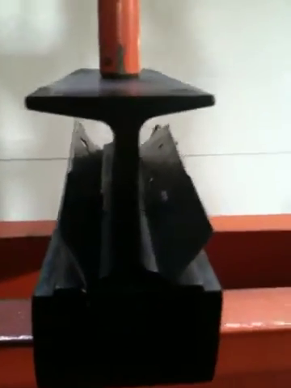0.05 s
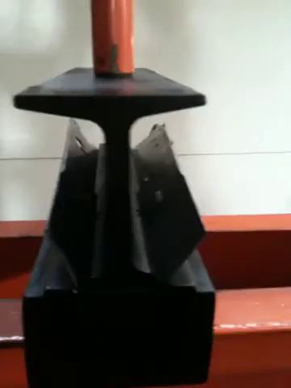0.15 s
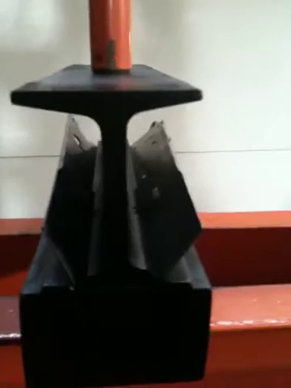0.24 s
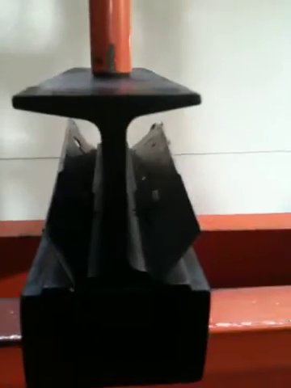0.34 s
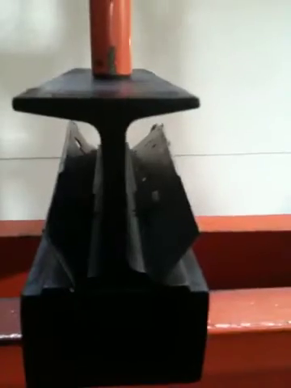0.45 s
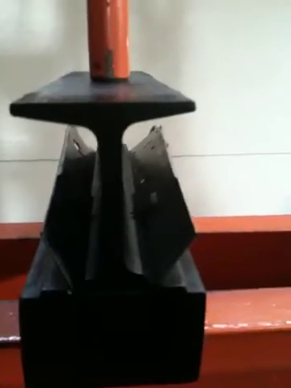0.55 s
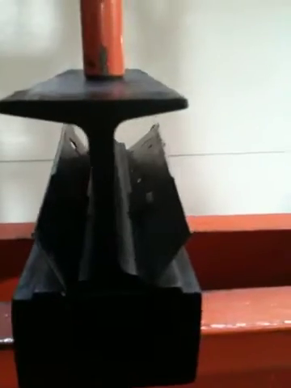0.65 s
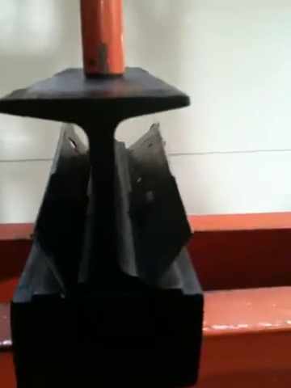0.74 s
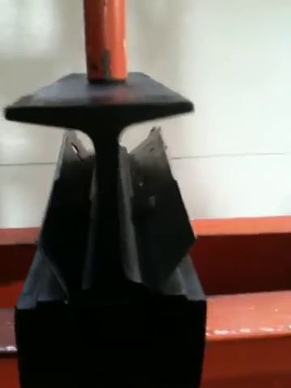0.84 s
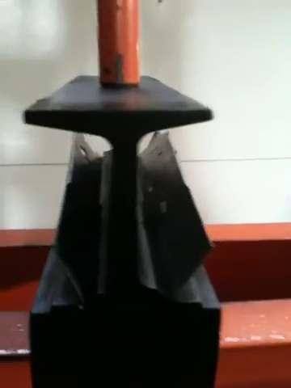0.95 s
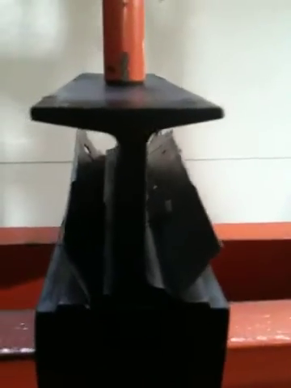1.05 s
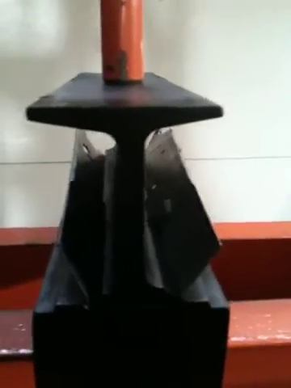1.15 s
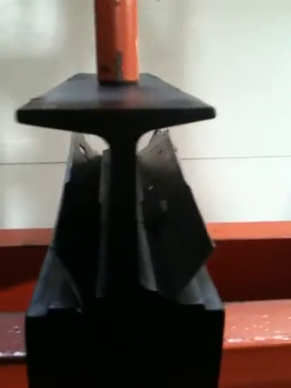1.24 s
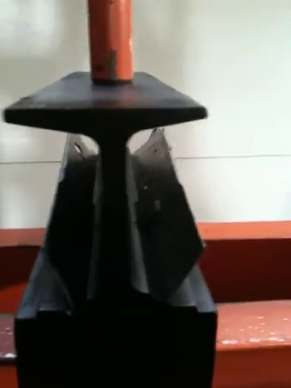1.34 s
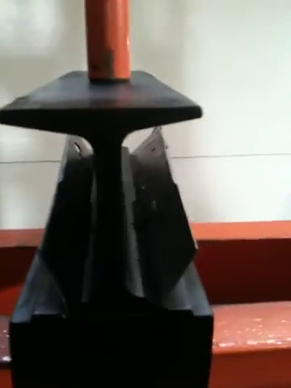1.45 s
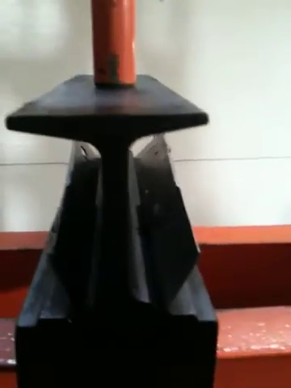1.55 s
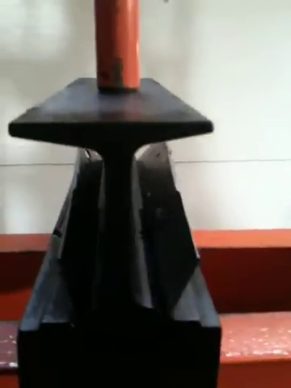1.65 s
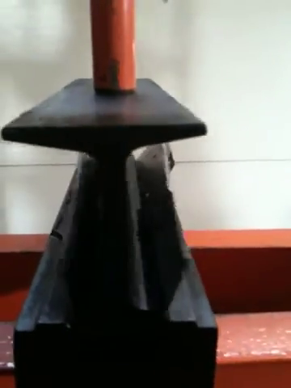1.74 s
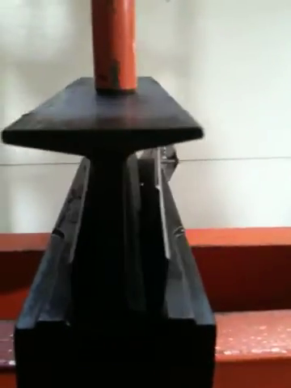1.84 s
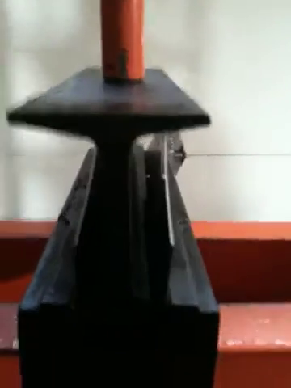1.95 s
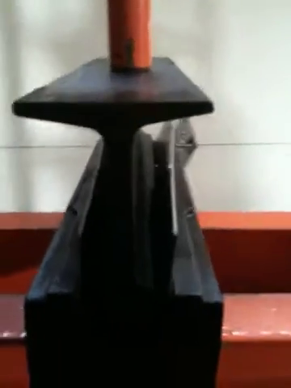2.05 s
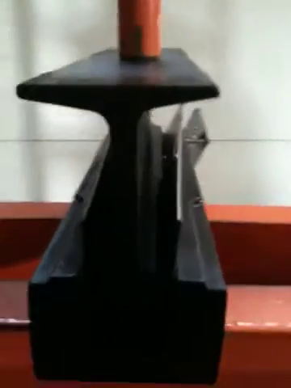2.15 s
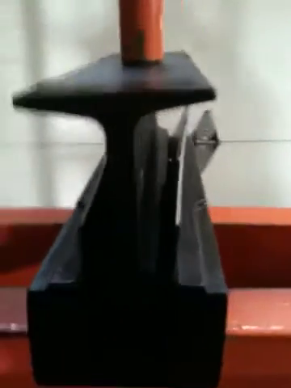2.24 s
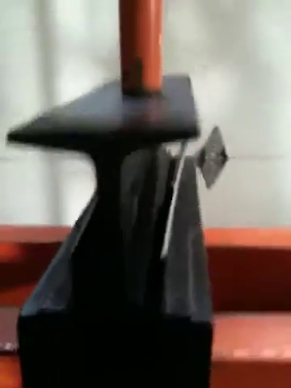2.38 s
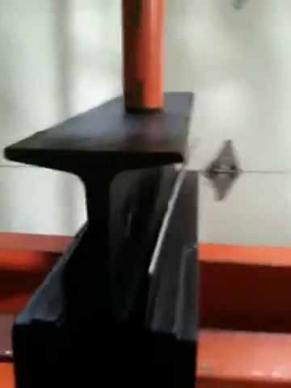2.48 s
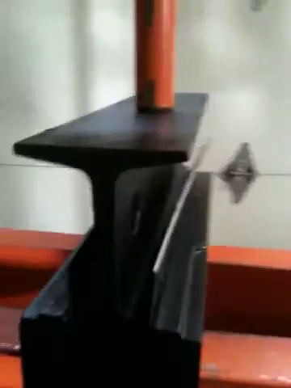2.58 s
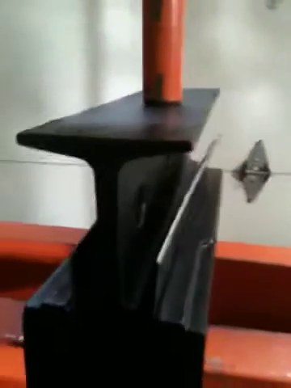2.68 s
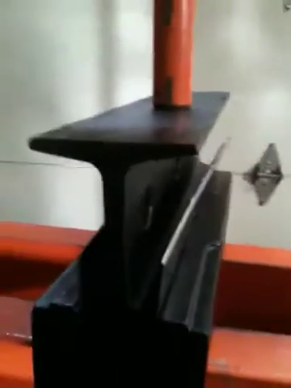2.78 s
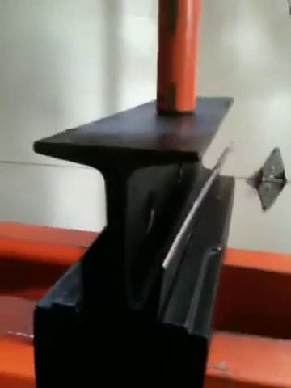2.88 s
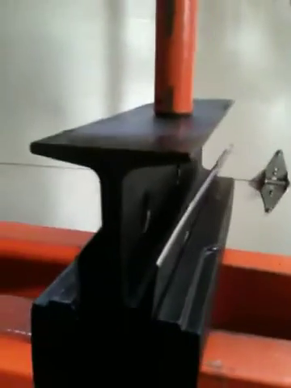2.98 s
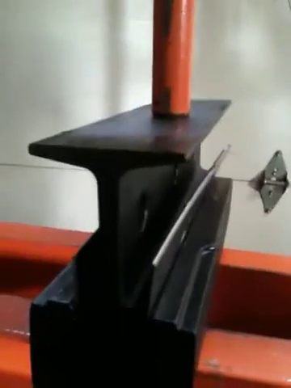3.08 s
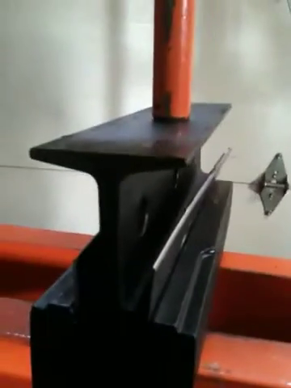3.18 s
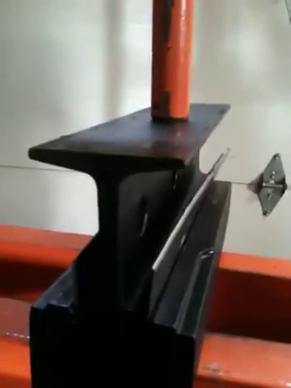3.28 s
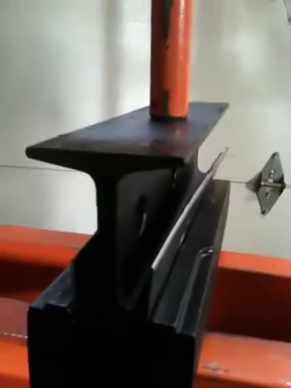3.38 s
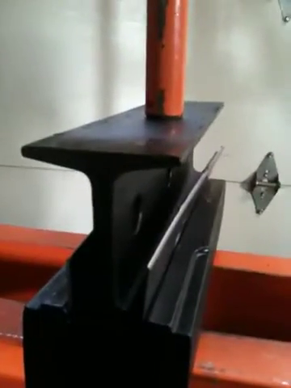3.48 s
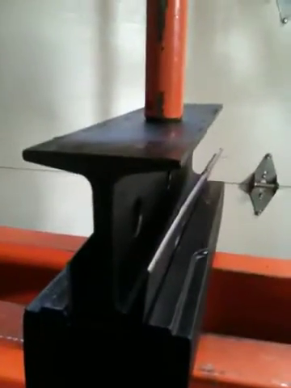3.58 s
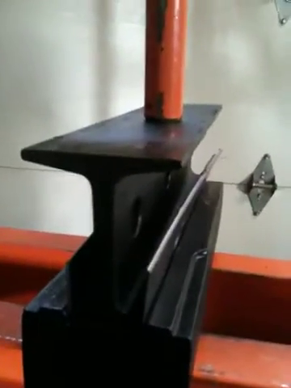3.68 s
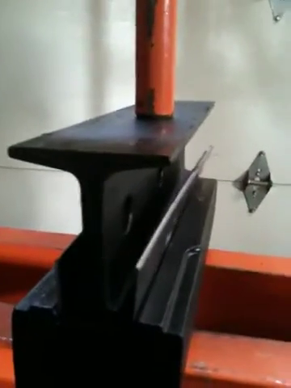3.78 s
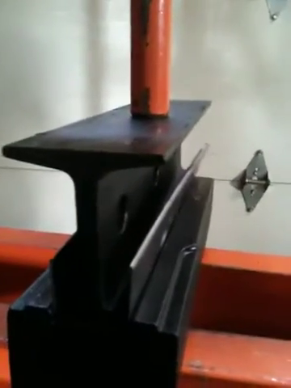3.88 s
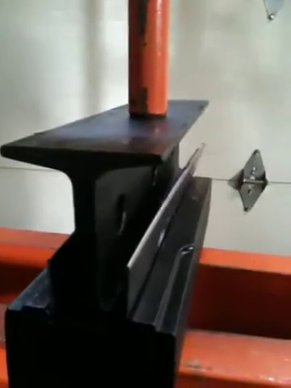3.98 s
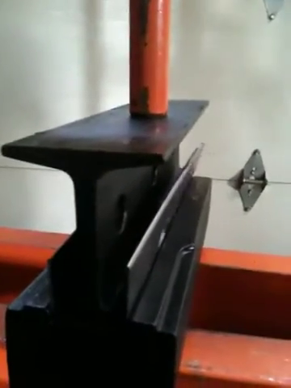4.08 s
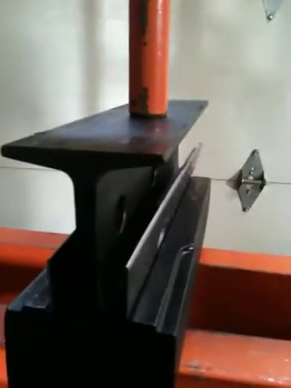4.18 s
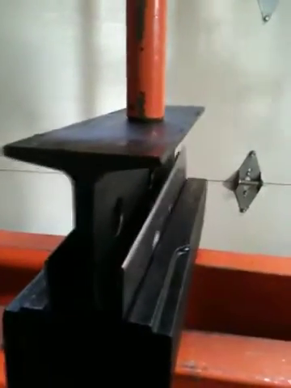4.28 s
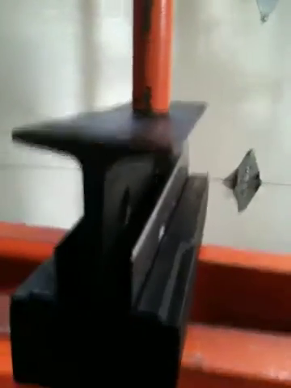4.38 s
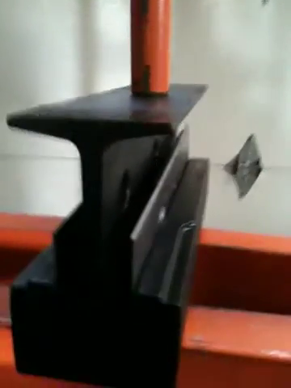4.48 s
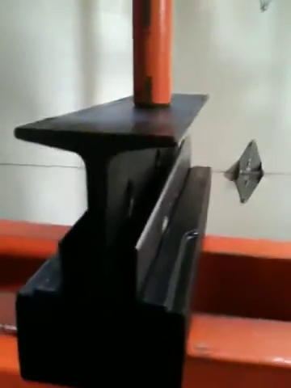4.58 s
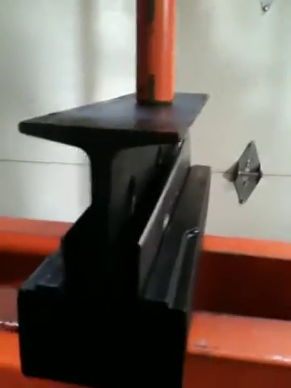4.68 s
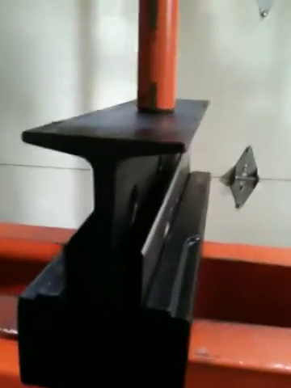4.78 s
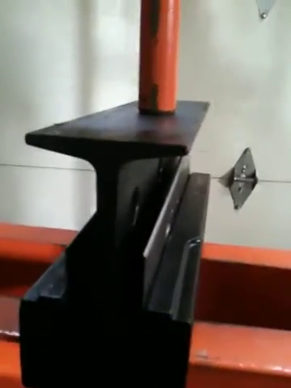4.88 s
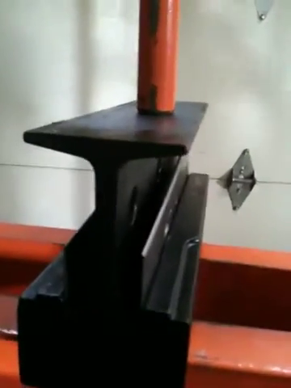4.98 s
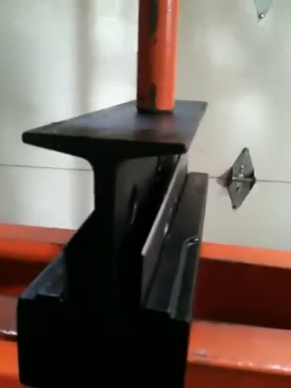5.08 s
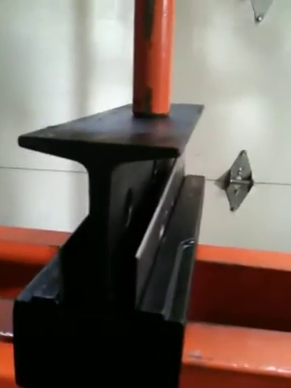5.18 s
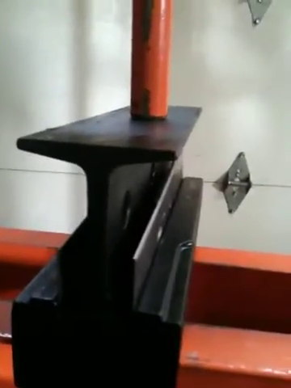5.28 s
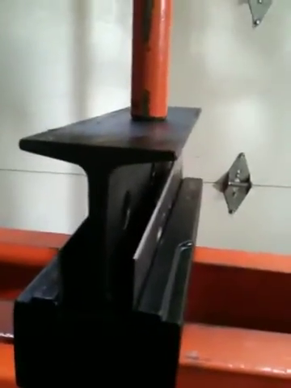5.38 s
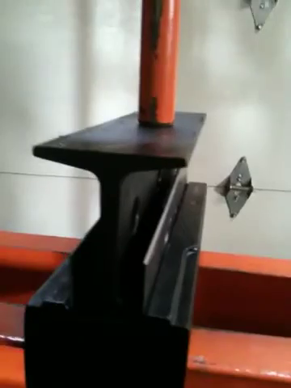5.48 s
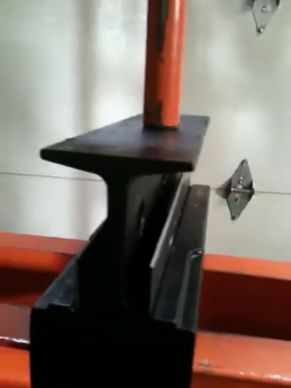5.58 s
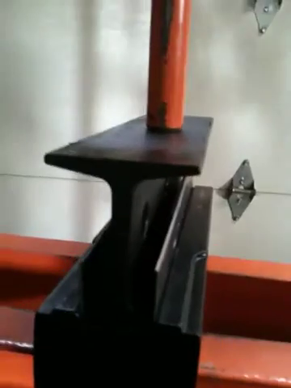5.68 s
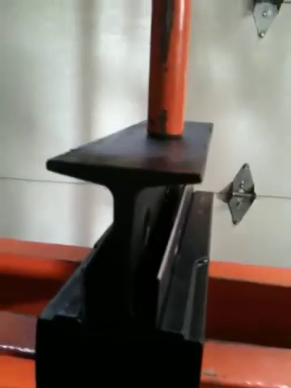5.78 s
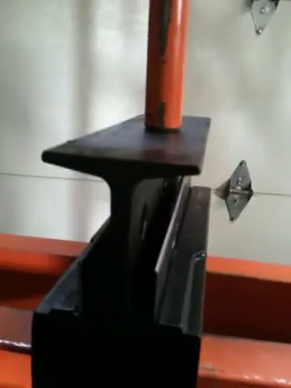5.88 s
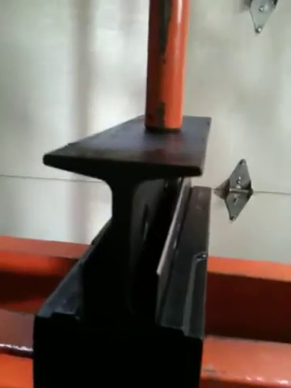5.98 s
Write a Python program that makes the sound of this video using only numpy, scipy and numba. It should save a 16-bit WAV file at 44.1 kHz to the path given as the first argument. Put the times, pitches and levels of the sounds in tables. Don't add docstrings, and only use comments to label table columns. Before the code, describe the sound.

Close to a hydraulic press bending sheet steel: quiet hum and hiss, small uneven knocks, then near-quiet. A sudden distorted steel crash rings out for a couple of seconds, with sharp little clinks in its tail. After a few tiny ticks, a fiercer crash bursts out, slapping and shimmering, followed by evenly spaced clacks and a final sharp clink. Short reflections come from hard walls.

```python
import sys
import numpy as np
from scipy import signal
from scipy.fft import rfft, irfft
from scipy.io import wavfile
from numba import njit

SR = 44100
rng = np.random.default_rng(int(sys.argv[2]) if len(sys.argv) > 2 else 0)


def wav_out(sig):
    wavfile.write(sys.argv[1], SR, np.round(np.clip(np.atleast_2d(sig).T, -1, 1) * 32767).astype(np.int16))


def to_linear_factor(level_db):
    exponent = np.asarray(level_db, float) / 20
    return 10 ** exponent


N = 265905

# pitch in Hz, level in dB, time to fall 60 dB in seconds.
LEFTOVER = [(991, -75, .8), (1087, -68, .55), (1357, -75, 0.74), (1513, -62, .3), (1567, -61, 0.67),
            (1674, -82, .7)]
LEFTOVER_DB = -31

# time in seconds, pitch in Hz, level in dB.
HUM = [(0, 191.3, -65), (2, 188.6, -65), (4, 192.8, -65.5), (6.03, 190.6, -65)]
# pitch in Hz, level in dB.
HUM_LINES = [(120, -85), (286.5, -82.5), (335, -85.5)]
# frequency in Hz, level in dB per Hz.
FLOOR = [(30, -28), (60, -30.5), (120, -17.5), (190, -4.5), (250, -12.5), (345, -10), (650, -19.5),
         (1130, -19), (2170, -26.5), (6700, -29.5), (12000, -29), (16000, -35)]
FLOOR_DB = -68.5

# start in seconds, clack level in dB, thud level in dB, ring pitch in Hz.
ROCKS = [(0.0024, -63, -60, 1570), (0.1335, -61, -50, 1940), (0.309, -75, -58, 1970),
         (0.3394, -81, -58, 1930), (0.4246, -50, -51, 1536), (0.4791, -71, -49, 2070),
         (0.6294, -80, -55, 2000), (0.8042, -73, -51.5, 1990), (0.9993, -82, -62, 1850),
         (2.276, -49, -56, 2200), (2.852, -58, -50, 733), (4.6196, -38.5, -47, 1920),
         (4.7935, -38, -38, 1847), (4.9765, -39, -38.5, 1890), (5.149, -42.5, -38, 1890),
         (5.334, -44, -40, 2600), (5.512, -49, -43, 2610), (5.5173, -45, -43, 1530),
         (5.5936, -42, -57, 3060), (5.6845, -42, -39, 1995)]
ROCK_TICK_DB, ROCK_T60_S = -22, 0.15
# pitch in Hz, level in dB, time to fall 60 dB in seconds.
ROCK_THUD = [(718, -6.5, 0.3), (912, 5, 0.2), (1075, -8.5, 0.35), (1284, -0.5, 0.25), (1530, -2, 0.25),
             (1575, -8, 0.42), (1624, -2.5, 0.21), (508.5, -9.5, 0.18)]
# start in seconds, tick level in dB, thud level in dB, ring pitch in Hz.
CLINKS = [(0.1714, -64.5, -86, 2060), (0.2194, -66, -56.5, 1800), (0.3708, -47.5, -49.5, 1850),
          (0.4034, -49, -38, 1730), (2.149, -52, -55, 6500), (2.198, -46.5, -51.5, 7140),
          (2.2439, -41, -52, 1830), (2.3146, -53.5, -49, 3100), (2.5317, -58, -53, 3010),
          (2.761, -54, -46, 1780), (2.8235, -53.5, -55, 1730), (2.836, -44.5, -50, 7750),
          (4.8678, -44.5, -41, 6660), (4.9503, -49.5, -49, 1830), (5.0143, -46, -39, 3100),
          (5.5485, -42.5, -64, 1700), (5.581, -33.5, -37, 5160)]
CLINK_CLACK_DB, CLINK_T60_S = 0, 0.067
# pitch in Hz, level in dB, time to fall 60 dB in seconds.
THUD = [(705, -3, 0.35), (733, 1, 0.19), (800, -8, 0.45), (902, -1, 0.15), (1086, -5.5, 0.38),
        (1336, -12.5, 1), (1482, -2.5, 0.18), (1568, -4, 0.41)]
# pitch in Hz, level in dB, time to fall 60 dB in seconds.
CLACK = [(1920, 2, 0.055), (2140, -7, 0.25), (2080, -11, 0.18), (2620, -12, 0.3), (2940, -3, .25),
         (3140, 1, 0.14), (3580, -4.5, 0.17), (4500, -10, 0.13)]
# start in seconds, level in dB, ring pitch in Hz.
TICKS = [(1.309, -70, 9500), (1.479, -65, 10820), (2.229, -60, 9800), (2.256, -55, 10500),
         (2.288, -57, 5000), (2.326, -58, 11500), (3.764, -62, 8300), (3.789, -65, 6430),
         (3.841, -56, 8400), (3.894, -62, 11000), (3.955, -68.5, 7880), (3.982, -59.5, 8520),
         (4.009, -69, 6510), (4.074, -70, 7560), (4.219, -69, 8000), (5.05, -63, 7100),
         (5.5665, -39.5, 7800)]
# frequency in Hz, level in dB.
TICK = [(4500, -1.5), (7500, -3), (10500, -21.5), (15000, -53.5)]
SOFT_S = 0.0011

# start in seconds, level in dB, swell in seconds.
BONGS = [(.134, -57, 0.0044), (.215, -56.5, 0.008), (.335, -54, .02), (.402, -40.5, .006),
         (.425, -51, 0.0084), (.48, -66, 0.011), (2.246, -44.5, 0.0032), (2.28, -37.5, 0.021),
         (2.535, -53, .008), (2.77, -56, .005), (2.856, -40, 0.023), (4.62, -48, .01), (4.8, -45, .01),
         (4.98, -47, .01), (5.155, -52, .01), (5.34, -56, 0.011), (5.52, -45, .01), (5.59, -40, 0.012),
         (5.69, -53, 0.011)]
# pitch in Hz, level in dB, time to fall 60 dB in seconds.
BONG = [(713, -17, .2), (737, 2.5, 0.17)]
# start in seconds, peak level in dB,
# ring pitch in Hz, time to fall 60 dB in seconds, treble spit level in dB.
SNAPS = [(0.3713, -41.5, 2940, .007, -54), (2.15, -38, 7000, .003, -70), (2.1987, -42, 7100, .004, -58),
         (2.2765, -39, 5500, .003, -70), (2.2965, -41, 3500, .004, -75), (2.8358, -29, 7760, .006, -42),
         (2.836, -40, 10340, .008, -60), (2.852, -31, 4600, .004, -58), (2.8578, -33.5, 7200, .012, -62),
         (4.8664, -33, 6560, 0.02, -52), (5.5804, -21, 4300, .004, -38), (5.589, -38, 7300, .008, -55),
         (5.5935, -32, 3050, 0.013, -55), (5.598, -37, 4480, .01, -60)]
SNAP_RISE_S, SNAP_LIFT_DB, SNAP_SHOP_DB = 0.00076, 9, -10.5

# start in seconds, blow level in dB, steel-on-steel contact level in dB,
# thump level in dB, glint level in dB.
SLIPS = [
    (1.8493, -8, -37.5, -42, -33.5),
    (4.3405, 1, -20, -36.5, -15.5),
]
TEAR_S, TEAR_DB, SWELL_S = .0016, -12, .0003
BUILD_SHARE, BUILD_S = 0.48, 0.023
RAGGED_DB, RAGGED_PER_S = 2.5, 60
SHEET_DB, FRAME_DB, BEAM_DB = -4, -0.3, 5
WASH_DB, SHIMMER_DB = -27.5, -10
WOBBLE_PER_S, TWIN_DB = 14, -3.5

# frequency in Hz, level in dB per Hz.
CRASH = [
    [(35, -60), (60, -50), (268, -18.5), (437, -14), (566, -28), (715, -9), (862, -12), (1510, 0),
     (1860, -10.5), (2520, -13), (8710, -26), (16000, -42.5)],
    [(35, -69), (60, -59), (256, -26.5), (323, -3), (515, -44.5), (698, -2), (842, -17), (1200, -2),
     (2650, -9), (3500, -7), (5800, -15.5), (8000, -13.5), (16000, -16.5)],
]
# frequency in Hz, time to fall 60 dB in seconds.
CRASH_T60 = [
    [(60, .15), (200, 0.36), (400, 0.3), (1000, .29), (3000, 0.34), (8000, 0.32), (11500, .16),
     (15000, .08)],
    [(60, .3), (200, 0.48), (400, 0.34), (1000, .29), (3000, 0.35), (8000, 0.32), (11500, .13),
     (15000, 0.038)],
]
SHEET_HZ = [
    [374, 725, 991, 1082, 1177, 1213, 1256, 1308, 1455, 1515, 1552, 1803, 1979, 2109, 2223, 2274, 2348,
     2443, 2524, 2601, 2803, 2914, 2978, 4094],
    [592, 796, 967, 1022, 1080, 1151, 1181, 1234, 1266, 1310, 1340, 1520, 1598, 1644, 1721, 1967, 2114,
     2247, 2333, 2428, 2520, 3039, 3158, 3382, 3444, 3653, 3792, 4041, 4733, 5037],
]
# level in dB, time to fall 60 dB in seconds.
SHEET = [
    [(-23, 0.24), (-0.5, 0.11), (-27.5, 0.76), (-14, 0.34), (-18, 0.27), (-13, 0.23), (-23.5, 0.51),
     (-21.5, 1), (-19.5, 0.23), (-9, 0.18), (-10.5, 0.074), (-29, 0.11), (-24.5, 0.49), (-19, 0.47),
     (-13, 0.11), (-21, 0.42), (-19.5, 0.14), (-24.5, 0.33), (-25, 0.23), (-19, 0.37), (-37.5, 0.74),
     (-21.5, 0.44), (-21.5, 0.39), (-21.5, 0.38)],
    [(-26, 1), (-8.5, 0.22), (-23.5, 0.78), (-19, 0.82), (-23.5, 0.44), (-20, 0.96), (-13, 0.25),
     (-11.5, 0.51), (-13.5, 0.87), (-14, 1), (-17, 0.75), (-13.5, 0.74), (-20.5, 0.9), (-19, 0.61),
     (-16, 0.26), (-19.5, 0.57), (-3, 0.31), (-15.5, 0.16), (-26, 0.2), (-17.5, 0.21), (-23.5, 0.2),
     (-21.5, 0.5), (-17, 0.17), (-12, 0.41), (-11, 0.13), (-20.5, 0.4), (-18, 0.24), (-25.5, 0.46),
     (-19, 0.39), (-16, 0.056)],
]
# pitch in Hz, level in dB, time to fall 60 dB in seconds.
BEAM = [(6200, -16.5, 0.2), (6787, -12.5, 0.33), (7400, 4, 0.28), (7830, -2.5, 0.19), (8600, 1, 0.18),
        (8240, -19.5, 0.4), (8800, 2, 0.16), (9660, -10, 0.26), (10000, -17.5, 0.29), (9900, -20.5, 0.25),
        (11000, -17, 0.28), (10700, -21.5, 0.29), (11500, -17, 0.15), (11900, -19.5, 0.25),
        (11820, -14.5, 0.18), (12400, -15.5, 0.25), (12150, -7.5, 0.11), (13100, -19.5, 0.17),
        (13490, -21.5, 0.2), (13800, -21.0, 0.22), (3630, -13, .65), (4655, -20, .7), (5755, -22, .75),
        (6800, -31.5, 0.78)]
# pitch in Hz, level in dB, time to fall 60 dB in seconds.
GLINT = [(11000, -23.5, .4), (11800, -18.5, .35), (12800, -13.5, .3), (12900, -20, .27), (13300, -17, .27),
         (13800, -15, .2), (14700, -19, .25), (15210, -14.5, .2), (15500, -20.5, .2)]
FRAME_HZ = [
    [287, 355, 759, 817, 876, 934, 996, 1049, 1101, 1145, 1190, 1226, 1236, 1268, 1291, 1308, 1334, 1349,
     1362, 1389, 1405, 1423, 1447, 1479, 1500, 1551, 1601, 1649, 1706],
    [425, 501, 594, 627, 649, 695, 755, 815, 876, 934, 970, 995, 1043, 1075, 1095, 1141, 1188, 1228, 1255,
     1291, 1305, 1326, 1343, 1354, 1372, 1390, 1500, 1518, 1551, 1649],
]
# level in dB, time to fall 60 dB in seconds.
FRAME = [
    [(-59, 4.6), (-60.5, 5.1), (-70, 48), (-61.5, 3.2), (-58.5, 4.3), (-66.5, 3.4), (-65, 7.1), (-52, 2.7),
     (-50.5, 3.6), (-45, 2.6), (-46, 2.25), (-56, 7), (-51.5, 2.3), (-44, 2.55), (-41.5, 3.22),
     (-40.5, 2.2), (-38, 1.9), (-46, 3.7), (-47, 4.2), (-49.5, 3.2), (-61, 4.31), (-53, 4.5), (-52, 2.8),
     (-58.5, 8.1), (-55, 3), (-44.5, 3.5), (-63.5, 4.8), (-72, 13), (-66, 5.69)],
    [(-54.5, 4.8), (-45, 1.9), (-42.5, 2.1), (-48.5, 5.3), (-50, 3.5), (-51, 6.1), (-41.5, 6.7),
     (-50.5, 5.7), (-50.5, 5.2), (-50, 6.4), (-34, 2.17), (-50.5, 9.8), (-46, 4.3), (-54, 4.5), (-46.5, 6),
     (-34.5, 4.6), (-32.5, 3.1), (-43.5, 4.006), (-52, 2.74), (-50, 8.7), (-33, 2.2), (-44, 5), (-47, 5.7),
     (-53.5, 3.2), (-33, 2.9), (-39, 3.3), (-40, 6.7), (-47.5, 8), (-43.5, 5.1), (-51.5, 11)],
]
# frequency in Hz, level in dB per Hz.
WASH = [(120, -62), (200, -31), (462, -23), (499, -19), (545, -27.5), (606, -10), (916, -21), (943, -11),
        (1150, 0.5), (2000, -12.5), (2600, -52), (4400, -120)]
# frequency in Hz, time to fall 60 dB in seconds.
WASH_T60 = [(200, 8.9), (600, 2.2), (1300, 2.4), (1900, 2.1)]
# frequency in Hz, level in dB per Hz.
SHIMMER = [(1900, 5.5), (3500, -3), (6000, -3.5), (12000, -15)]
# frequency in Hz, time to fall 60 dB in seconds.
SHIMMER_T60 = [(1900, 2), (4000, 1.1), (7000, 0.8), (12000, 0.8)]
# pitch in Hz, level in dB, time to fall 60 dB in seconds.
THUMP = [
    [(30, 10, .08), (65, 4, .05), (110, 3, .35), (233, 18, .1), (310, 12, .1), (345, 6, .4),
     (421, 17.5, 0.15)],
    [(30, -2, .3), (108, -9, 0.66), (160, -14, .8), (222, -14, .9)],
]

# start in seconds, level in dB.
SLAPS = [
    (1.876, -23.5),
    (1.892, -23.5),
    (1.908, -26),
    (4.386, -17),
    (4.405, -18),
    (4.428, -16),
    (4.442, -22),
    (4.461, -24.5),
]
# frequency in Hz, level in dB per Hz.
SLAP = [(600, -19.5), (1300, -3.5), (2200, -4.5), (3400, 0), (5000, -9), (8000, -12.5), (14000, -28.5)]
# frequency in Hz, time to fall 60 dB in seconds.
SLAP_T60 = [(600, 0.23), (3400, 0.17), (14000, .08)]
# start in seconds, pitch in Hz, level in dB,
# time to fall 60 dB in seconds, swell in seconds.
WHIP = [(4.341, 720.6, -8.5, .26, .002), (4.341, 621, -15.5, .2, .004), (4.352, 2127, -14, .2, .005),
        (4.39, 1152, -18, .5, .006), (4.388, 1243, -13, 0.32, .006), (4.4, 3300, -22, 0.27, 0.0071),
        (4.424, 3470, -20, 0.218, .004), (4.341, 5640, -28, .4, .002), (4.341, 8290, -28, 0.45, .002),
        (4.341, 4224, -28.5, .4, .002), (4.341, 6934, -33, .4, .002), (4.341, 12970, -29, .2, .002)]
# start in seconds, end in seconds,
# pitch in Hz, width in Hz, level in dB.
DRONES = [
    (3.95, 4.4, 424, 3, -72),
    (4.0, 4.4, 1366, 6, -73.5),
    (3.55, 3.85, 1100, 6.8, -72),
    (3.3, 3.6, 70, 40, -81),
    (4.7, 5.5, 75, 50, -80),
    (5.53, 5.85, 90, 40, -76),
]

# frequency in Hz, time to fall 60 dB in seconds.
SHOP_T60 = [(100, 0.14), (1000, 0.436), (4000, 0.37), (14000, 0.28)]
SHOP_DB = -4
BASS_CUT_HZ, CUTOFF_HZ, OVERLOAD = 90, 16400, 0.62


def at_hz(points, hz):
    table_hz, value = np.array(points)[:, 0], np.array(points)[:, 1]
    return np.interp(np.log(hz), np.log(table_hz), value)


def add(x, s, sound):
    i = round(s * SR)
    x[i:i + len(sound)] += sound[:N - i]


def swell(sound, seconds):
    return sound * (1 - np.exp(-np.arange(len(sound)) / (max(seconds, 1e-4) * SR)))


@njit
def resonate(turn, state, size):
    out, re, im = np.zeros(size), state.real.copy(), state.imag.copy()
    c, s = turn.real.copy(), turn.imag.copy()
    for i in range(size):
        out[i] = im.sum()
        for k in range(len(re)):
            re[k], im[k] = re[k] * c[k] - im[k] * s[k], re[k] * s[k] + im[k] * c[k]
    return out


def struck(hz, level_db, t60, seconds, phase=0):
    t60 = np.maximum(t60, seconds / 50)
    hz, gain, t60, phase = np.broadcast_arrays(np.atleast_1d(hz), to_linear_factor(level_db), t60, phase)
    turn = to_linear_factor(-60 / (t60 * SR)) * np.exp(2j * np.pi * hz / SR)
    return resonate(turn, gain * np.exp(2j * np.pi * phase), round(seconds * SR))


def struck_anyhow(modes, blow_db, seconds):
    hz, level_db, t60 = np.transpose(modes)
    return struck(hz, level_db + blow_db, t60, seconds, rng.random(len(hz)))


def dying_noise(spectrum, t60s, seconds, ragged_db=0):
    t = np.arange(round(seconds * SR)) / SR
    edges = 40 * 2 ** (np.arange(27) / 3)
    out, power = 0, 0
    for low, high in zip(edges, edges[1:]):
        hz = np.sqrt(low * high)
        band_filter = signal.butter(2, [low, high], "band", fs=SR, output="sos")
        band = signal.sosfilt(band_filter, rng.standard_normal(len(t)))
        flicker = np.interp(t * RAGGED_PER_S, np.arange(99), rng.standard_normal(99))
        gain = to_linear_factor(at_hz(spectrum, hz))
        out = out + gain * band * to_linear_factor(ragged_db * flicker - 60 * t / at_hz(t60s, hz))
        power += gain ** 2 * (high - low) / (SR / 2)
    return out / np.sqrt(power)


def crowd(spectrum, t60s, low_hz, high_hz, seconds, count):
    place, strength, damping, phase = rng.random((count, 4)).T
    hz = low_hz * (high_hz / low_hz) ** ((np.arange(count) + place) / count)
    level_db = at_hz(spectrum, hz) + 10 * np.log10(hz) + 10 * strength
    level_db -= 10 * np.log10(np.sum(to_linear_factor(level_db) ** 2) / 2)
    return struck(hz, level_db, at_hz(t60s, hz) * (0.31 + .8 * damping), seconds, phase)


def crack(low_hz, high_hz, level_db, t60):
    t = np.arange(SR // 4) / SR
    burst = swell(rng.standard_normal(len(t)) * to_linear_factor(level_db - 60 * t / t60), 0.0019)
    band_filter = signal.butter(3, [low_hz, high_hz], "band", fs=SR, output="sos")
    return signal.sosfilt(band_filter, burst)


def frame_ring(which, blow_db, seconds):
    hz = np.array(FRAME_HZ[which])
    level_db, t60 = np.transpose(FRAME[which])
    phase, twin_phase, split = rng.random((3, len(hz)))
    out = struck(hz, level_db + blow_db, t60, seconds, phase)
    twin_hz = hz + 9 * (split - .5)
    twin_db = level_db + blow_db + TWIN_DB
    wobble_time = np.arange(len(out)) * WOBBLE_PER_S / SR
    for k in range(3):
        wobble = np.interp(wobble_time, np.arange(199), rng.standard_normal(199))
        twins = struck(twin_hz[k::3], twin_db[k::3], t60[k::3], seconds, twin_phase[k::3])
        out += twins * (0.7 + 0.9 * wobble)
    return out


def leftover():
    out = np.zeros(N)
    add(out, 0, frame_ring(0, LEFTOVER_DB, 1.7) + struck(*np.transpose(LEFTOVER), 1.7))
    return out


def hum():
    s, hz, level_db = np.transpose(HUM)
    t = np.arange(N) / SR
    waver = np.interp(t, np.linspace(0, N / SR, 60), rng.standard_normal(60))
    turns = np.cumsum(np.interp(t, s, hz)) / SR
    out = to_linear_factor(np.interp(t, s, level_db) + 1.2 * waver) * np.sin(2 * np.pi * turns)
    for line_hz, line_db in HUM_LINES:
        out += to_linear_factor(line_db + 2.5 * waver[::-1]) * np.sin(2 * np.pi * line_hz * t)
    return np.sqrt(2) * out


def floor():
    hz = np.maximum(np.fft.rfftfreq(N, 1 / SR), 1)
    noise = irfft(rfft(rng.standard_normal(N)) * to_linear_factor(at_hz(FLOOR, hz)), N)
    return to_linear_factor(FLOOR_DB) * noise / np.std(noise)


def tick(level_db, ring_hz, t60):
    noise = crack(3000, 9000, level_db + 9.5, 0.033)
    edges = np.array(TICK)[:, 0]
    for low, high in zip(edges, edges[1:]):
        band_db = at_hz(TICK, np.sqrt(low * high))
        noise = noise + crack(low, high, level_db + band_db + 1.0, t60)
    close_hz = ring_hz * (1 + 0.015 * rng.standard_normal(3))
    return noise, struck(close_hz, np.full(3, level_db - 8.5), 0.48 * t60, .25)


def knock(tick_db, clack_db, thud_db, ring_hz, t60, jig):
    out = np.zeros(SR // 2)
    noise, ring = tick(tick_db, ring_hz, t60)
    add(out, 0, noise)
    add(out, 0, crack(1400, 3300, clack_db + 9.0, t60))
    add(out, 0, crack(3220, 4900, clack_db - 6.5, t60))
    add(out, 0, crack(674, 1790, thud_db + 7.5, t60))
    lift_db = (max(clack_db - tick_db, 0) + 4.5) * (ring_hz < 5000)
    add(out, 0, swell(ring, 0.00062) * to_linear_factor(lift_db))
    for modes, blow_db in [(CLACK, clack_db - 15), (jig, thud_db - 9.5)]:
        hz, level_db, ring_t60 = np.transpose(modes)
        detune, strength = rng.standard_normal((2, len(hz)))
        mode_hz = hz * (1 + 0.00463 * detune)
        mode_db = blow_db + level_db + 2.36 * strength
        add(out, 0, swell(struck(mode_hz, mode_db, ring_t60, 0.5), SOFT_S))
    return out


def rocks():
    out = np.zeros(N)
    for s, clack_db, thud_db, ring_hz in ROCKS:
        add(out, s, knock(clack_db + ROCK_TICK_DB, clack_db, thud_db, ring_hz, ROCK_T60_S, ROCK_THUD))
    return out


def bongs():
    out = np.zeros(N)
    for s, db, rise_s in BONGS:
        add(out, s, swell(struck_anyhow(BONG, db, .3), rise_s))
    return out


def clinks():
    out = np.zeros(N)
    for s, tick_db, thud_db, ring_hz in CLINKS:
        add(out, s, knock(tick_db, tick_db + CLINK_CLACK_DB, thud_db, ring_hz, CLINK_T60_S, THUD))
    return out


def snaps():
    out = np.zeros(N)
    for s, peak_db, ring_hz, t60, spit_db in SNAPS:
        add(out, s, swell(struck(ring_hz, peak_db + SNAP_LIFT_DB, t60, .05), SNAP_RISE_S))
        add(out, s, crack(11300, 15800, spit_db, 0.03))
    return out


def loose_ticks():
    out = np.zeros(N)
    for s, tick_db, ring_hz in TICKS:
        noise, ring = tick(tick_db, ring_hz, 0.059)
        add(out, s, noise)
        add(out, s, ring)
    return out


def slips():
    out = np.zeros(N)
    for k, (s, blow_db, contact_db, thump_db, glint_db) in enumerate(SLIPS):
        bang = np.zeros(N - round(s * SR))
        seconds = len(bang) / SR
        build = 1 - BUILD_SHARE * np.exp(-np.arange(SR) / (BUILD_S * SR))
        crash = dying_noise(CRASH[k], CRASH_T60[k], 1, ragged_db=RAGGED_DB)
        add(bang, 0, to_linear_factor(blow_db + 1.0) * build * crash)
        sheet = np.column_stack([SHEET_HZ[k], SHEET[k]])
        add(bang, 0, struck_anyhow(sheet, SHEET_DB, 0.84))
        add(bang, 0, struck_anyhow(BEAM, contact_db + BEAM_DB, 1))
        add(bang, 0, struck_anyhow(GLINT, glint_db, 1))
        add(bang, 0, frame_ring(k, FRAME_DB, seconds))
        wash = crowd(WASH, WASH_T60, 220, 1900, min(2.4, seconds), count=170)
        add(bang, 0, to_linear_factor(blow_db + WASH_DB) * wash)
        shimmer = crowd(SHIMMER, SHIMMER_T60, 2000, 12000, 1.68, count=260)
        add(bang, 0, to_linear_factor(contact_db + SHIMMER_DB) * shimmer)
        hz, level_db, t60 = np.transpose(THUMP[k])
        add(bang, 0, struck(hz, level_db + thump_db, t60, 1))
        add(out, s, swell(bang, SWELL_S))
        add(out, s - TEAR_S, crack(3200, 11000, TEAR_DB, 0.025))
    return out


def whip():
    out = np.zeros(N)
    for s, db in SLAPS:
        add(out, s, to_linear_factor(db) * swell(dying_noise(SLAP, SLAP_T60, .3), .001))
    for s, hz, db, t60, rise_s in WHIP:
        add(out, s, swell(struck(hz, db, t60, .6, rng.random()), rise_s))
    return out


def drones():
    out = np.zeros(N)
    for start_s, end_s, hz, width, db in DRONES:
        size = round((end_s - start_s) * SR)
        r = np.exp(-np.pi * width / SR)
        feedback = [1, -2 * r * np.cos(2 * np.pi * hz / SR), r * r]
        tone = signal.lfilter([1, 0, -1], feedback, rng.standard_normal(2 * SR))[-size:]
        add(out, start_s, to_linear_factor(db) * tone / np.std(tone) * signal.windows.tukey(size, .5))
    return out


def shop(x):
    tail = dying_noise([(40, 2.5), (16000, 4.5)], SHOP_T60, .7)
    tail = tail / np.sqrt(np.sum(tail ** 2))
    tail = np.r_[np.zeros(round(.004 * SR)), tail]
    return signal.fftconvolve(x, tail)[:N]


def scene():
    no_bass = signal.butter(4, 430, "high", fs=SR, output="sos")
    small = signal.sosfilt(no_bass, rocks() + clinks() + loose_ticks()) + bongs()
    sharp = snaps()
    walls = shop(to_linear_factor(SHOP_DB) * small + to_linear_factor(SNAP_SHOP_DB) * sharp)
    press = leftover() + slips() + whip() + drones()
    return (press + small + sharp + walls + hum() + floor())[None]


def low_pass(x):
    return signal.sosfilt(signal.butter(12, 16800, fs=SR, output="sos"), x)


def record(dry):
    bass_cut = signal.butter(2, BASS_CUT_HZ, "high", fs=SR, output="sos")
    top_cut = signal.cheby2(12, 50, CUTOFF_HZ, fs=SR, output="sos")
    thin = signal.sosfilt(top_cut, signal.sosfilt(bass_cut, dry))
    clipped = thin / (1 + np.abs(thin / OVERLOAD) ** 6.0) ** (1 / 6.0)
    overtone_cut = signal.firwin(63, CUTOFF_HZ - 100, fs=SR)[None]
    cut = signal.fftconvolve(clipped, overtone_cut, "same")
    mix = signal.lfilter([1, -1], [1, -.993], cut)
    return low_pass(mix)


dry = scene()
out = record(dry)
wav_out(out)
```